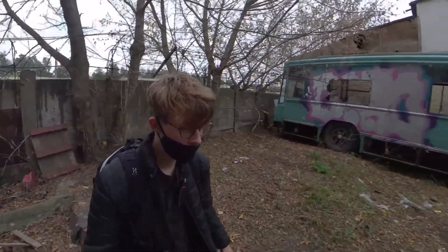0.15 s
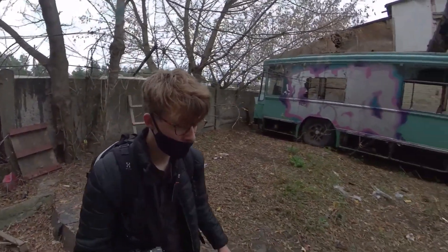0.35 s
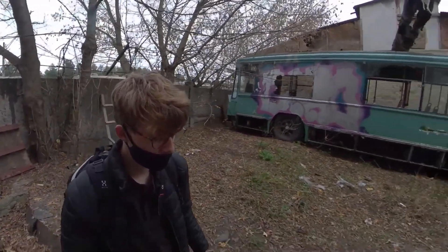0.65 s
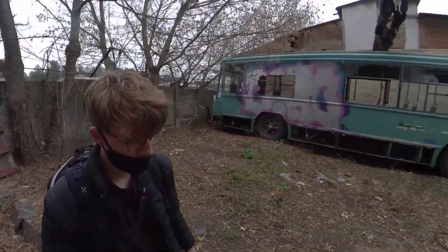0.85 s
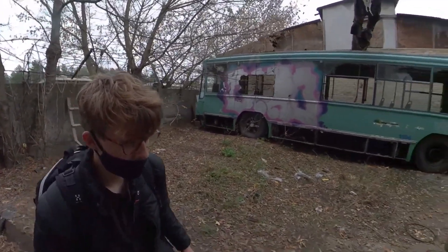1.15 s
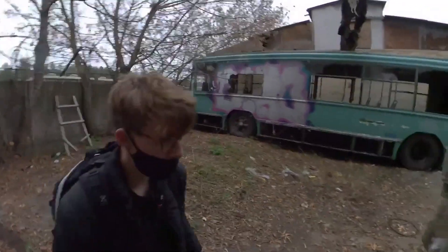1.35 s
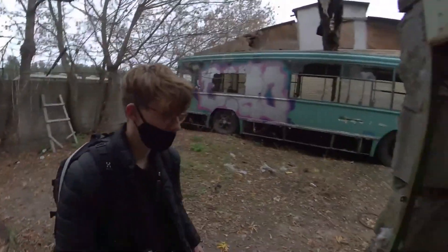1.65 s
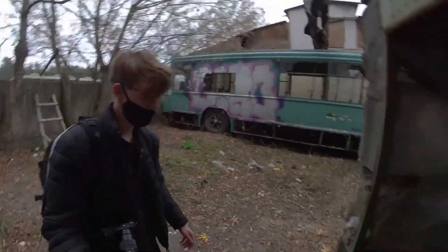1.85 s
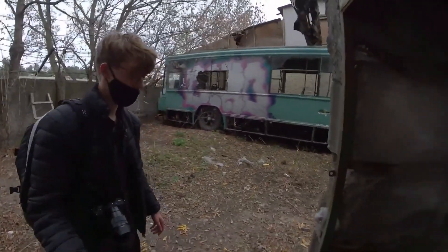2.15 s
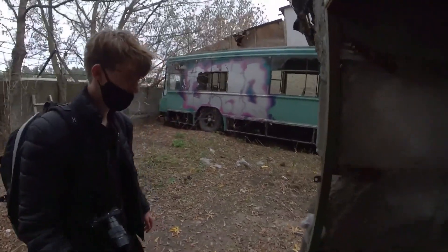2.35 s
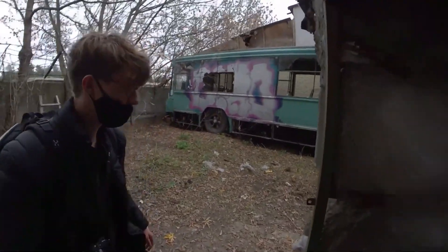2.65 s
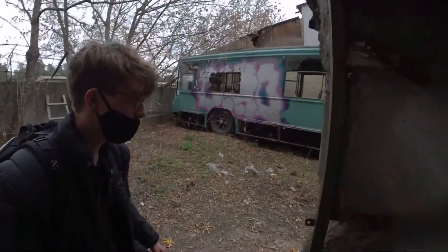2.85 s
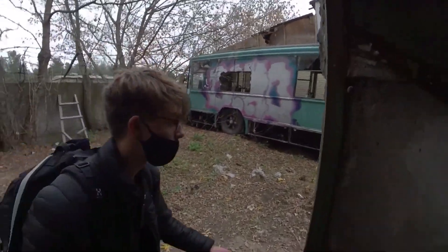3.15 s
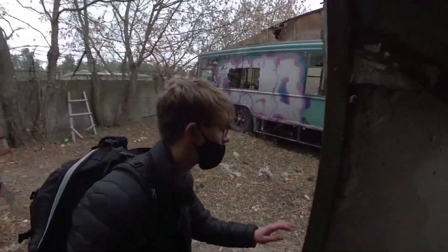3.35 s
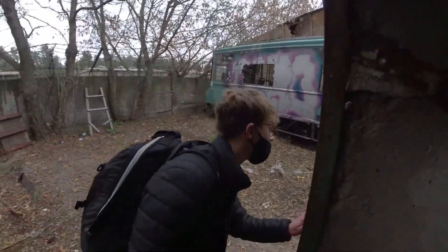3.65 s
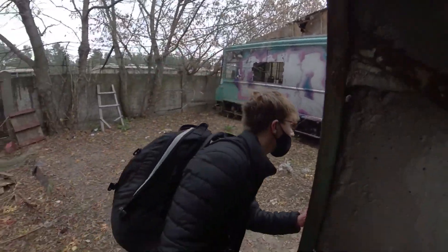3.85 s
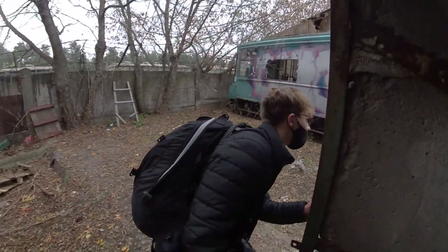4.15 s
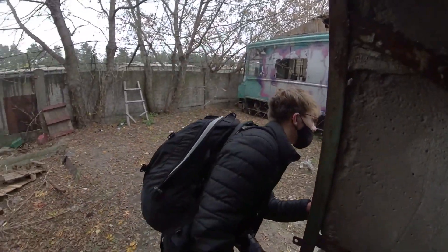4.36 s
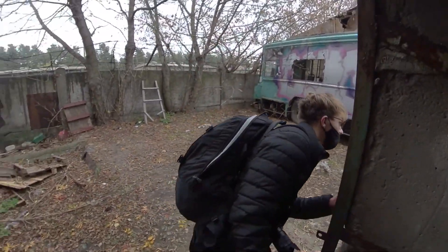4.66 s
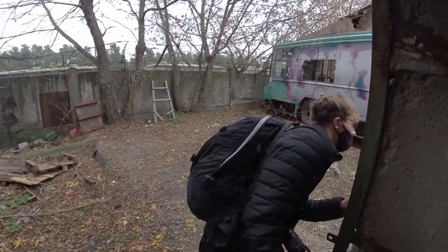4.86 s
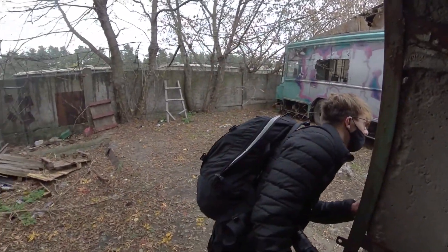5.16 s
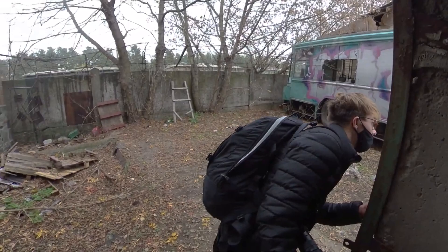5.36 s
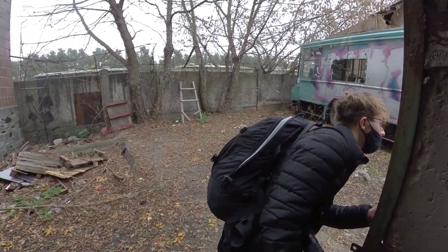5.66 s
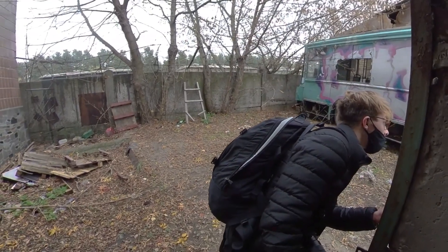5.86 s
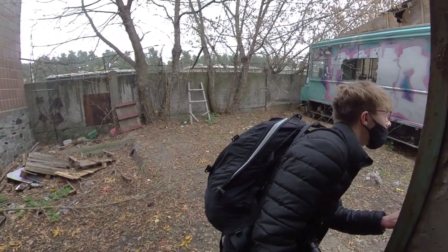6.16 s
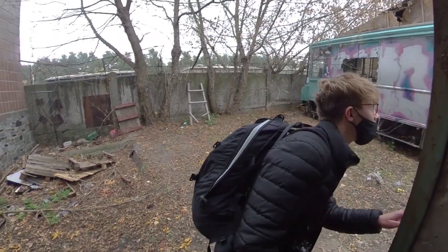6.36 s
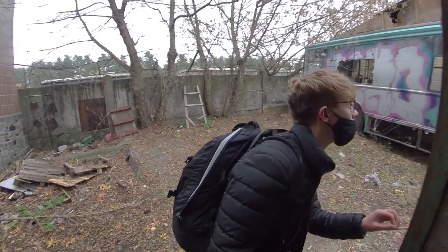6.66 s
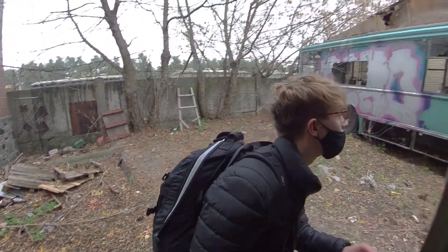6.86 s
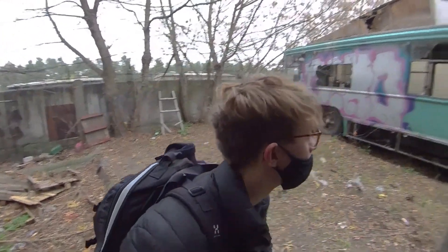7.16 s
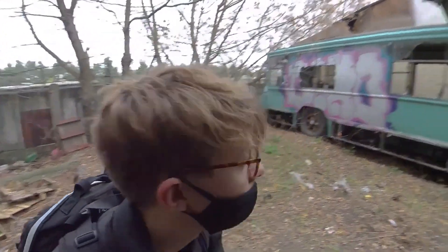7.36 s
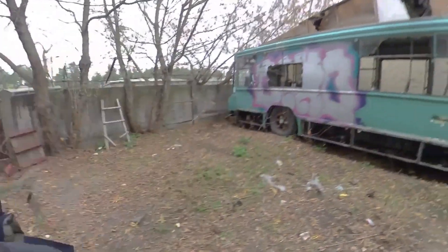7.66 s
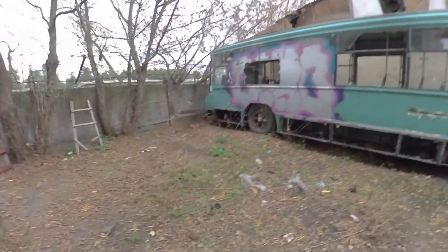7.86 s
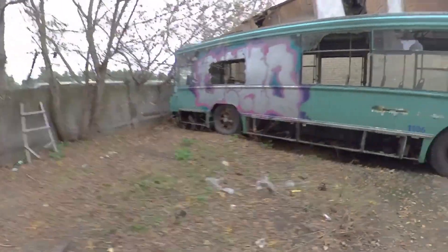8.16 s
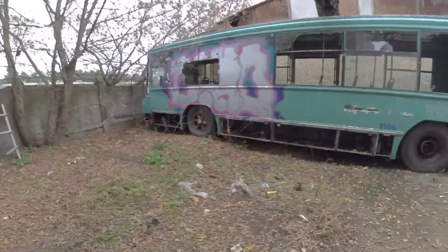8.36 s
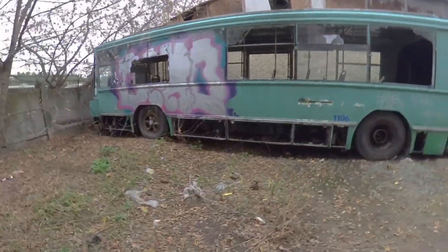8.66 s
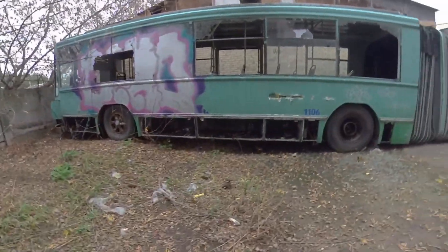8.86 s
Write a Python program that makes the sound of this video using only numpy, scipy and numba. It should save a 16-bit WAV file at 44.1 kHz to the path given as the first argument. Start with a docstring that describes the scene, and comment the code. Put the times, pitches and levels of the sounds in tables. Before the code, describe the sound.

Close, dry outdoor sound: crisp leaf rustle with bright crackle, gritty sole scuffs, short hollow clicks near the middle pitch range and low thumps from a hand on a pole, the thumps mostly on the right. Activity is busy for the first two and a half seconds, scuffs past three, nearly stops around five, stirs lightly past six, and ends in clustered knocks, clicks and crunches. A very faint hiss and low rumble lie beneath.

```python
"""Dry leaves rustle in dense grains under the shoes of a walker in a quiet walled yard.
Soles scuff grit, single leaves tick, and short hard clicks ring, many of them on the knocked pole.
The hand rubs and knocks this pole, which carries a small camera; the pole's low modes
reach mostly the right microphone. Faint background noise, random and shaped, lies under it all."""
import sys
import numpy as np
from scipy import signal
from scipy.fft import rfft, irfft
from scipy.io import wavfile
from scipy.ndimage import uniform_filter1d
from numba import njit

SR = 44100
rng = np.random.default_rng(int(sys.argv[2]) if len(sys.argv) > 2 else 0)


def transcribe(signal):
    """Save signal, clipped to [-1, 1], as a 16-bit WAV file at the path in sys.argv[1]."""
    frames = np.atleast_2d(signal).T
    limited = np.clip(frames, -1, 1)
    pcm = np.round(limited * 32767).astype(np.int16)
    wavfile.write(sys.argv[1], SR, pcm)


N = 397341
TIME = np.arange(N) / SR  # seconds
PORT_LAG = 14  # samples by which the left microphone hears the ground later
LEFT_ONLY = np.array([[1], [0]])


def undb(db):
    """Turn dB into gain."""
    return 10 ** (np.asarray(db) / 20)


def unit(x):
    """Scale to an rms of 1."""
    return x / np.sqrt(np.mean(x ** 2))


def along(points, hz):
    """Read (frequency [Hz], value) points on a log-frequency axis."""
    f, v = np.transpose(points)
    return np.interp(np.log(hz + 1), np.log(f), v)


def colour(x, points):
    """Filter x by (frequency [Hz], gain [dB]) points."""
    hz = np.arange(N // 2 + 1) * SR / N
    return irfft(rfft(x) * undb(along(points, hz)), N)


def curves(tables):
    """Read span tables at every sample; the first column, a level, falls silent between spans."""
    rows = []
    for table in tables:
        first, last = table[0], table[-1]
        rows.append((first[0] - .03, -100, *first[2:]))
        rows.extend(table)
        rows.append((last[0] + .03, -100, *last[2:]))
    s, *columns = np.transpose(rows)
    return [np.interp(TIME, s, c) for c in columns]


def pair(x, pan_db, lag):
    """Make two channels whose mean, apart from the lag, is x; the left one is late by lag samples."""
    ratio = undb(pan_db)
    left, right = np.roll(x * ratio, lag), x * np.ones(len(x))
    return np.array([left, right]) * 2 / (1 + ratio)


@njit
def svf(x, hz, width):
    """State-variable band-pass with a moving centre; width is a share of the centre."""
    y, band, low = np.empty(len(x)), 0., 0.
    for i in range(len(x)):
        g = np.tan(np.pi * hz[i] / SR)
        v = (band + g * (x[i] - low)) / (1 + g * (g + width))
        band, low, y[i] = 2 * v - band, low + 2 * g * v, width * v
    return y


def ring(x, hz, t60):
    """Excite one damped mode, which dies by 60 dB in t60 seconds."""
    pole = np.exp(2j * np.pi * hz / SR - np.log(1000) / (t60 * SR))
    return signal.lfilter([1], [1, -pole], x).imag


def grains(rate, spread_db, tail_s, bed):
    """Envelope of scattered breaks (rate per second), a few much louder, over a steady bed of tiny ones."""
    loudness_db = spread_db * np.minimum(rng.exponential(size=N), 2.5)
    hits = (rng.random(N) < rate / SR) * undb(loudness_db)
    tails = signal.lfilter([1], [1, -np.exp(-1 / (tail_s * SR))], hits)
    return unit(bed + unit(tails))


def swell(s, db, rise_s, fall_s):
    """Power of one swell: up to its peak and down again, both straight in dB, 20 dB in the given times."""
    # very short or negative times count as 10 ms of rise and 20 ms of fall
    falling, rising = (TIME - s) / max(fall_s, .02), (s - TIME) / max(rise_s, .01)
    return undb(2 * (db - 20 * np.maximum(falling, rising)))


def add(out, s, sound):
    """Mix a stereo sound in at time s."""
    i = int(s * SR)
    out[:, i:i + sound.shape[1]] += sound[:, :N - i]


# Overlapping swells of leaf rustle, several of which may form one crunch: (time of peak [s],
# fine rustle level [dB], swelling by 20 dB [s], dying by 20 dB [s], coarse rustle against fine [dB])
RUSTLE_SWELLS = [(0.048, -48, 5, 0.25, -8), (0.616, -47.5, 0.01, 0.19, -4), (0.65, -36.5, 0.045, .07, -6.5),
                 (0.7, -46.5, 0.11, 0.27, -8), (0.77, -55.5, 0.22, 0.04, -5.5), (0.878, -62, 0.1, .2, -11),
                 (0.996, -58, -0.04, 0.2, -9), (1.043, -57.5, 0.1, .15, -10), (1.083, -56, 0, 0.06, -9.5),
                 (1.327, -54, .15, 0.1, -4.5), (1.429, -44.5, .045, 0.25, -4), (1.541, -49, 0.13, 0.24, -6),
                 (1.971, -54.5, 0.2, 0.14, -7.5), (2.22, -52, .045, 0.06, -5.5),
                 (2.32, -55.5, .1, 0.32, -3.5), (2.925, -62.5, 0.2, .1, -7), (2.998, -59, 0.1, .5, -7),
                 (3.165, -52, .12, 0.31, -4.5), (3.305, -51.5, 0.15, .17, -12), (3.39, -52, 0.02, 0.2, -23),
                 (3.487, -55, 0.05, .2, -14), (3.617, -54, 0.05, 0.1, -12), (4.09, -54.5, 0.06, .2, -7.5),
                 (4.141, -46.5, 0.08, .12, -11.5), (4.2, -53.5, .2, 0.15, -9.5), (4.36, -66, 0.5, 0.35, -4),
                 (6.016, -53.5, 0.06, .15, -8.5), (6.281, -57.5, 0.15, 0.1, -11),
                 (6.348, -59, 0.15, .2, -13), (6.484, -49, 0.04, 0.03, -9), (6.55, -56, .2, 0.24, -6),
                 (6.635, -56, .15, 0.1, -5), (7.074, -60.5, 0.17, 0.4, -5.5), (7.757, -60, 0.35, 0.6, -0.5),
                 (7.912, -59.5, -0.1, .2, -10), (8.077, -54, .25, 0.23, -5.5),
                 (8.472, -46.5, -0.02, 0.17, -7), (8.546, -46, 0.14, 0.16, -5.5),
                 (8.72, -56, -0.1, 0.1, -3.5), (8.958, -54, 0.1, -1.24, -3)]
# Faint stirring of leaves under the swells: (time [s], fine rustle level [dB], coarse against fine [dB])
LEAF_STIRRING = [(0, -66, -6), (0.55, -67, -5), (1.2, -66, -8), (1.8, -62.5, -3.5), (2.2, -67.5, -1.5),
                 (2.8, -66, -5), (3.7, -67.5, -2.5), (4.7, -70, -5.5), (5.9, -72.5, -13), (6.8, -62, -5),
                 (7.6, -70, -6.5), (8.3, -66.5, -5.5), (9.01, -62.5, -4)]


def rustle():
    """Levels of the fine rustle and of the coarse one against it: the swells add to the stirring."""
    stir_db, share_db = curves([LEAF_STIRRING])
    fine, coarse = undb(2 * stir_db), undb(2 * (stir_db + share_db))
    for s, db, rise_s, fall_s, coarse_db in RUSTLE_SWELLS:
        power = swell(s, db, rise_s, fall_s)
        fine = fine + power
        coarse = coarse + power * undb(2 * coarse_db)
    return 10 * np.log10(fine), 10 * np.log10(coarse / fine)


# Bands of the fine rustle, where small pieces crack higher: (centre [Hz], relative level [dB])
FINE_BANDS = [(5200, -4.5), (7500, 4), (10500, 4.5), (14500, 8)]
# Spectrum shape of the coarse rustle: (frequency [Hz], relative level [dB per Hz])
COARSE_SPECTRUM = [(600, -25), (1200, -4.5), (2000, -2), (2800, -6), (3700, -5.5), (4400, -2), (5200, -4),
                   (6500, -16.5), (10000, -23)]


def leaves():
    """Leaf fibres break in dense grains, small pieces in higher bands; loud crunches lie to the right."""
    fine_db, share_db = rustle()
    pan_db = -.25 * np.maximum(fine_db + 65.5, 0)
    together = grains(150., 3.6, 0.0063, 4.6)  # breaks shared by all sizes
    fine = apart = 0
    for hz, db in FINE_BANDS:
        crunch = undb(db) * together * grains(60., 1.6, 0.0098, 2.5)
        centre = np.full(N, 1. * hz)
        fine = fine + svf(svf(crunch * rng.standard_normal(N), centre, 0.71), centre, 0.71)
        apart = apart + svf(svf(crunch * rng.standard_normal(N), centre, .6), centre, .6)
    crunch = together * grains(76.0, 8.7, 0.015, 2.4)
    coarse, other = (unit(colour(crunch * rng.standard_normal(N), COARSE_SPECTRUM))
                     * undb(fine_db + share_db) for _ in range(2))
    # the treble of the rustle is wider in loud crunches, otherwise nearly the same in both channels
    spread = 0.014 + 0.06 * np.maximum(fine_db + 45, 0)
    wide = spread * unit(apart) * np.array([[1], [-1]])
    treble = undb(fine_db) * (pair(unit(fine), pan_db, lag=0) + wide)
    # the coarse part comes from many places, so only a share of it keeps one direction
    return treble + pair(1.18 * coarse, pan_db, PORT_LAG) + 0.9 * other * LEFT_ONLY


# Spectrum shape of the background noise: (frequency [Hz], relative level [dB per Hz])
BACKGROUND_SPECTRUM = [(15, -57), (25, 10.5), (49, 5), (70, 0), (86, -13), (161, -7.5), (216, -10),
                       (333, -9), (557, -11), (710, -11.5), (791, -11), (857, -11), (4330, -26.5),
                       (12100, -24), (15800, -28)]
BACKGROUND_DB = -61  # rms of the part common to both channels
# Likeness of the two channels: (frequency [Hz], left-right correlation [0 to 1])
CHANNEL_LIKENESS = [(30, 0.34), (300, 0.64), (1200, 0.55), (2500, 0.012), (5000, 0.018), (6500, 1),
                    (15000, 1)]


def background():
    """Faint background noise, shaped in frequency; above 6 kHz it is nearly the same in both channels."""
    hz = np.arange(N // 2 + 1) * SR / N
    like = np.clip(along(CHANNEL_LIKENESS, hz), 0, .99)
    mid, side = (rfft(rng.standard_normal(N)) * undb(along(BACKGROUND_SPECTRUM, hz)) for _ in range(2))
    side = side * np.sqrt((1 - like) / (1 + like))
    scale = undb(BACKGROUND_DB) / np.sqrt(np.mean(irfft(mid, N) ** 2))
    return scale * irfft([mid + side, mid - side], N) * undb([[-.5], [.5]])


# Soles dragging over grit: (time of peak [s], level [dB], dying by 20 dB [s], centre [Hz])
SOLE_DRAGS = [(0.18, -59, 0.83, 436), (0.82, -60.5, 0.63, 570), (1.35, -62.5, 0.92, 980),
              (1.58, -57.5, 0.54, 473), (1.95, -58, 0.2, 880), (2.22, -60.5, 0.43, 590),
              (2.56, -63.5, .5, 790), (3.163, -50, 0.11, 656), (3.22, -59.5, 0.48, 900),
              (3.265, -52, 0.28, 800), (3.3, -58, 0.13, 980), (3.34, -55.5, 0.25, 950),
              (3.41, -49.5, 0.17, 1060), (6.69, -62.5, 0.52, 1140), (7.75, -61, 1.53, 420),
              (8.07, -66, -2.26, 422), (8.25, -62, 0.93, 960), (8.5, -63, 0.37, 890),
              (8.59, -54.5, 0.23, 900), (8.75, -59, -0.5, 650)]
SCUFF_RISE = 0.66  # swelling time as a share of the dying time


def scuff():
    """Grit rolls under the sole: grains in one broad hollow resonance that moves with the contact."""
    power, weighted = 1e-12, 1e-12 * 700  # a tiny floor avoids dividing by zero
    for s, db, fall_s, centre_hz in SOLE_DRAGS:
        drag = swell(s, db, SCUFF_RISE * fall_s, fall_s)
        power, weighted = power + drag, weighted + drag * centre_hz
    hz = weighted / power  # the louder drag pulls the centre towards its own
    layers = []
    for _ in range(2):
        grit = grains(150., 2.0, 0.0057, 1.26) * rng.standard_normal(N)
        layers.append(unit(svf(svf(grit, hz, 1.4), hz, 1.0)))
    near, far = layers
    return np.sqrt(power) * (pair(near, -1.7, PORT_LAG) + .5 * far * LEFT_ONLY)


# Single leaves cracking: (time [s], peak level before panning [dB], pitch [Hz])
LEAF_TICKS = [(0.609, -35.5, 5900), (0.6234, -42, 12700), (0.6504, -36, 13900), (0.994, -45, 6350),
              (0.9945, -51, 3000), (1.041, -38.5, 12700), (1.0853, -41.5, 8490), (1.9752, -42, 5540),
              (3.1667, -45, 3340), (3.1884, -35, 14800), (3.738, -52, 2690), (4.0144, -52, 2590),
              (4.123, -33, 8500), (4.145, -32, 13400), (4.2055, -40, 7500), (4.4617, -50, 2580),
              (4.5394, -47.5, 2400), (4.795, -56, 2440), (6.0127, -46, 11000), (6.1489, -48, 13600),
              (6.344, -43, 10600), (6.3994, -46, 12000), (6.4844, -42, 11500), (6.5276, -41, 13900),
              (6.6344, -49, 2900), (8.7311, -31, 13500)]


def ticks():
    """A single dry leaf cracks: a quickly dying burst of noise around its pitch."""
    out, t = np.zeros((2, N)), np.arange(int(0.038 * SR)) / SR
    noises = rng.standard_normal((len(LEAF_TICKS), len(t)))
    for (s, db, hz), noise in zip(LEAF_TICKS, noises):
        centre = np.full(len(t), min(hz, 15000.))
        crack = svf(svf(noise * np.exp(-t / 0.0026), centre, 0.53), centre, 0.53)
        add(out, s, np.outer(undb([-3.0, 1.5]), crack / np.abs(crack).max() * undb(db)))
    return out


# Spans of the hand shifting on the pole: (time [s], level [dB])
GRIP_SPANS = [
    [(1.1, -66.5), (1.572, -48), (1.75, -53), (2.1, -63.5)],
    [(2.39, -50), (2.66, -72.5)],
    [(3.62, -77), (3.714, -59), (3.8, -78.5)],
    [(7.62, -73), (7.96, -65), (8.4, -63), (9.01, -61.5)],
]
# Modes of the pole, for rubs and knocks alike: (frequency [Hz], dying by 60 dB [s])
POLE_MODES = [(60.2, 0.32), (154.3, 0.11), (314, 0.078), (249, 0.039)]
# How the shaken pole reaches the microphones as the hold changes: (time [s], left minus right [dB])
POLE_BALANCE = [(1.4, -23), (1.54, -9), (1.72, -0.5), (2.05, -2), (2.39, -7), (2.62, -15), (3.7, -24),
                (9.01, -22.5)]
POLE_LAG = 30  # samples by which rubs and knocks reach the left microphone later


def grip():
    """Skin slips along the pole and shakes its modes."""
    db = curves(GRIP_SPANS)[0]
    pan_db = np.interp(TIME, *np.transpose(POLE_BALANCE))
    slips = grains(47.0, 1.9, 0.0017, 0.95) * rng.standard_normal(N)
    mode_db = (6.5, 8.0, -8.0, -9.5)
    body = sum(undb(g_db) * unit(ring(slips, hz, t60)) for (hz, t60), g_db in zip(POLE_MODES, mode_db))
    return pair(unit(body) * undb(db), pan_db, POLE_LAG)


# Knocks on the pole: (time [s], peak level of the second mode [dB], lowest mode against it [dB],
# two upper modes against it [dB])
POLE_KNOCKS = [(1.137, -38.5, -22, -12.5), (1.276, -43, -1, -6.5), (1.361, -29.5, -10, -14),
               (1.375, -41, -16, 8.5), (1.55, -24.5, -2, -27), (1.647, -18.5, -41, -12.5),
               (1.726, -39, -22, -26), (1.852, -51.5, 6, 14), (1.973, -48, -20, -22), (2.009, -51, -23, -5),
               (2.393, -34.5, -4.5, -29), (2.476, -43.5, -2, -25), (2.604, -46, -15, -18),
               (3.676, -56.5, -2, 0), (3.723, -55, -33, -13), (4.972, -54.5, -5, -9),
               (7.105, -55.5, -8, -12), (7.674, -34.5, -30, -9), (7.693, -47, -27, 5.5),
               (7.714, -32.5, -11, -20), (7.741, -34.5, -23, -11), (7.762, -36, -12, -26),
               (7.781, -46, -12, -3), (7.831, -37.5, -25, -11), (7.869, -38, -10, -23),
               (7.893, -35.5, -9, -2), (8.052, -53, -19.5, 0), (8.072, -33, -25, -15),
               (8.092, -32, -22, -8.5), (8.106, -32.5, -24, -7), (8.12, -31.5, -12, -39),
               (8.186, -36.5, -30, -7), (8.218, -35.5, -29, -17), (8.239, -41.5, -23.5, -27),
               (8.261, -33, -15, -14), (8.303, -43.5, -15, -6), (8.398, -49, -15, -13),
               (8.469, -38, 4.5, -3.5), (8.586, -38.5, -9, -8.5), (8.828, -45.5, 9, -10),
               (8.898, -43, -30, -5.5), (9.002, -36.5, -28, -10)]


def knocks():
    """A soft push of a few milliseconds rings the modes of the pole."""
    out, push = np.zeros((2, N)), np.zeros(int(.3 * SR))
    width = int(0.0023 * SR)
    push[:width] = np.hanning(width)
    modes = [ring(push, hz, t60) for hz, t60 in POLE_MODES]
    for s, db, low_db, upper_db in POLE_KNOCKS:
        pan_db = np.interp(s, *np.transpose(POLE_BALANCE))
        parts = zip(modes, (low_db, 0, upper_db, upper_db))
        knock = sum(m / m.max() * undb(db + g) for m, g in parts)
        add(out, s, pair(knock, pan_db, POLE_LAG))
    return out


# Short hard clicks ringing near 900 Hz, many of them on the knocked pole, others perhaps twigs:
# (time [s], peak level of the ring before panning [dB], ring [Hz], bright crack against the ring [dB])
HARD_CLICKS = [(1.277, -39, 1065, -9), (1.341, -34.5, 920, -1), (1.355, -24, 1000, -6),
               (1.361, -33, 1590, -6), (1.374, -16.5, 920, -14), (1.555, -38, 587, -5),
               (1.725, -44, 910, -20), (1.769, -43.5, 895, -15), (1.856, -26.5, 955, -16),
               (2.204, -50, 519, 2), (2.22, -40.5, 650, -8), (2.364, -39.5, 3120, -3),
               (2.391, -31, 940, -16), (2.564, -37.5, 760, -10.5), (3.153, -37.5, 3380, -22),
               (3.257, -37.5, 735, -14), (3.272, -30.5, 750, -19), (3.299, -38, 940, -19),
               (3.334, -37, 958, -21), (3.393, -28, 1040, -33), (3.398, -32, 1120, -33),
               (3.426, -37, 800, -29), (3.498, -37.5, 1180, -21), (6.67, -34, 1270, -17),
               (7.672, -44, 845, 5), (7.713, -46, 860, 4.5), (7.739, -43, 845, -10), (7.893, -36, 940, -17),
               (8.093, -41.5, 980, -4), (8.185, -44, 950, -7), (8.218, -37.5, 950, -10),
               (8.259, -32.5, 940, -3), (8.301, -30.5, 1080, -16), (8.32, -39, 890, -25),
               (8.397, -42.5, 930, -19), (8.47, -30.5, 950, -12.5), (8.501, -32, 825, -19),
               (8.517, -31.5, 1050, -18), (8.551, -20, 870, -19), (8.583, -26, 950, -17),
               (8.856, -37.5, 1010, -15), (8.953, -36, 2900, -17)]
CLICK_T60_S, DULL_RINGS = 0.014, 0.26  # ring at a crack of -12 dB; dB of longer ring per dB of duller crack
CLICK_PAN_DB, CLICK_LAG = -3, 11  # left minus right; samples by which the left is late


def hard_clicks():
    """A click and a short rattle ring a few damped modes, with a bright crack of noise on top."""
    out, t = np.zeros((2, N)), np.arange(int(.08 * SR)) / SR
    noises = rng.standard_normal((len(HARD_CLICKS), 3, len(t)))
    for (s, db, hz, crack_db), (left_rattle, crack_noise, right_rattle) in zip(HARD_CLICKS, noises):
        t60 = CLICK_T60_S * undb(-DULL_RINGS * (crack_db + 12))
        burst = crack_noise * (np.exp(-t / 0.00027) + 0.16 * np.exp(-t / 0.014))  # sharp start, weak tail
        crack = ring(ring(burst, 2280, 0.0067), 2280, 0.0067)
        crack = crack + 0.81 * ring(ring(burst, 3650, 0.0052), 3930, 0.0023)
        ears = []
        # each microphone gets its own rattle along with the common click
        for rattle in (left_rattle, right_rattle):
            blow = 0.025 * rattle * np.exp(-t / 0.013)
            blow[:16] += np.hanning(16) / 7  # the click lasts a third of a millisecond
            body = ring(blow, hz, t60)
            body = body + 0.88 * ring(blow, 1.297 * hz, 0.57 * t60)
            body = body + 0.54 * ring(blow, 1.51 * hz, 0.4 * t60)
            body = body + 0.33 * ring(blow, 0.457 * hz, 0.51 * t60)
            body = body - uniform_filter1d(body, size=151)  # takes the bass out
            ears.append(body / np.abs(body).max() + crack / np.abs(crack).max() * undb(crack_db))
        left, right = np.array(ears) * undb(db) * (t < .07)
        balance = undb([[CLICK_PAN_DB / 2], [-CLICK_PAN_DB / 2]])
        add(out, s, np.array([np.roll(left, CLICK_LAG), right]) * balance)
    return out


def scene():
    """All sources at the two microphones."""
    return leaves() + ticks() + scuff() + grip() + knocks() + hard_clicks() + background()


LOW_CUT_HZ, TOP_HZ = 67.8, 15780


def record(dry):
    """The microphones lose the deepest bass and the recorder cuts the top."""
    thin = signal.sosfilt(signal.butter(3, LOW_CUT_HZ, "high", fs=SR, output="sos"), dry)
    return signal.sosfilt(signal.ellip(10, .2, 75, TOP_HZ, fs=SR, output="sos"), thin)


dry = scene()
out = record(dry)
transcribe(out)
```